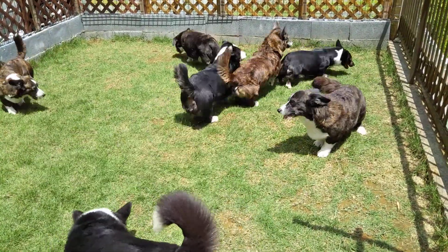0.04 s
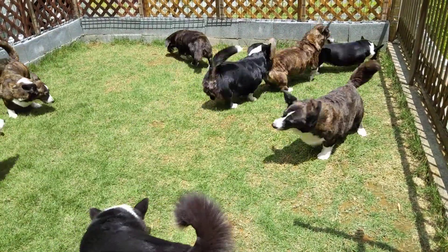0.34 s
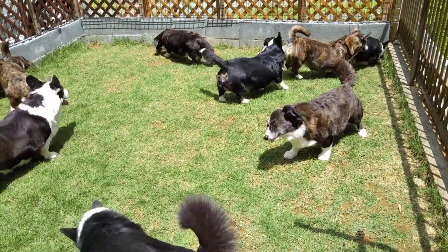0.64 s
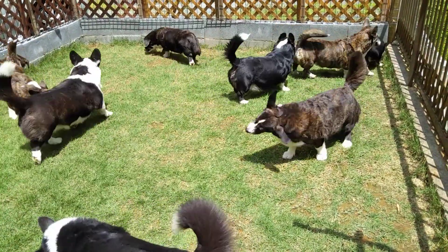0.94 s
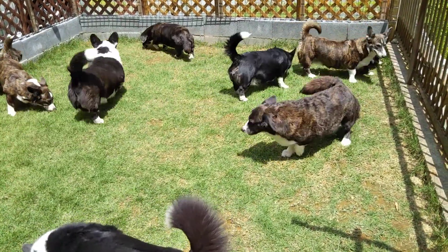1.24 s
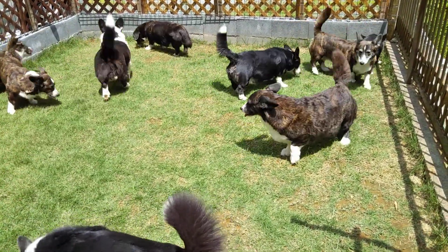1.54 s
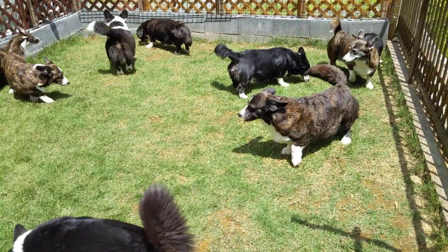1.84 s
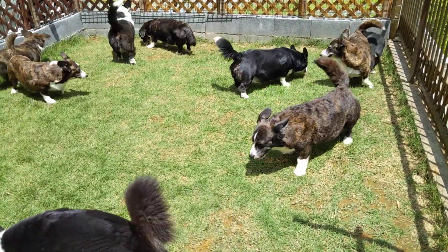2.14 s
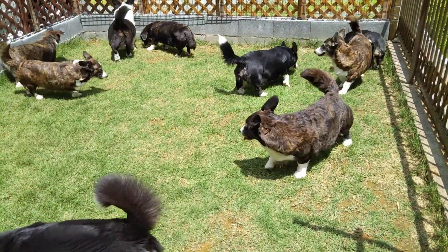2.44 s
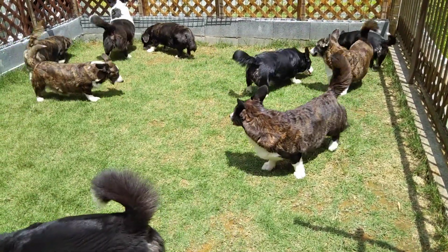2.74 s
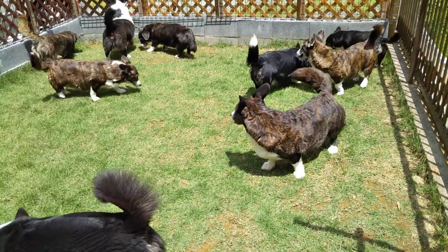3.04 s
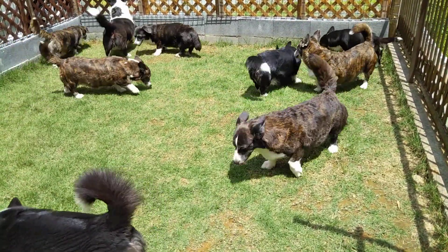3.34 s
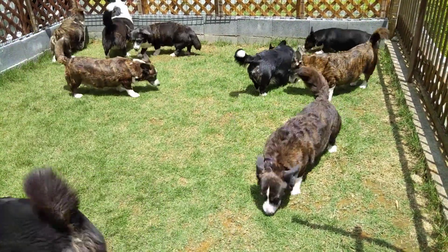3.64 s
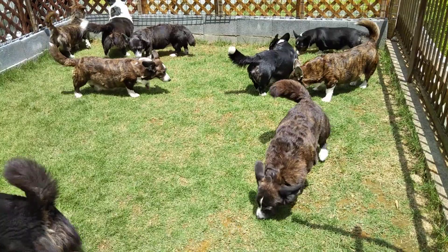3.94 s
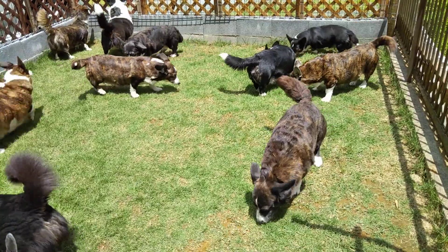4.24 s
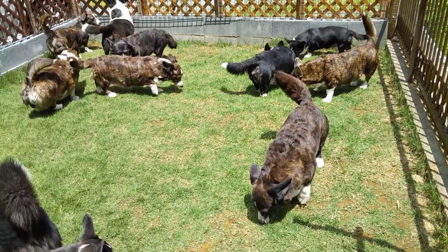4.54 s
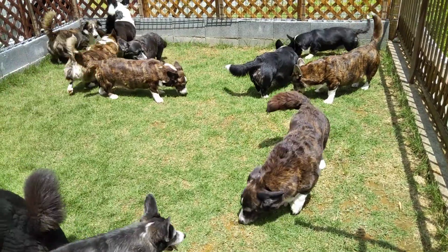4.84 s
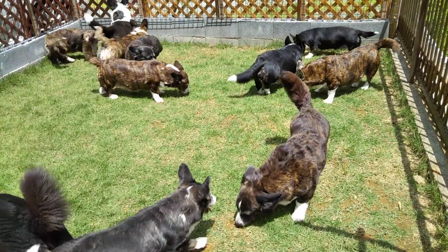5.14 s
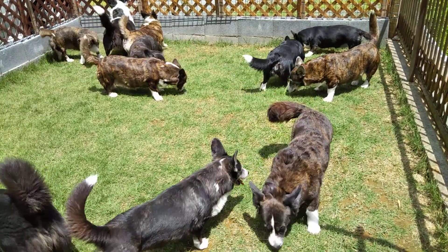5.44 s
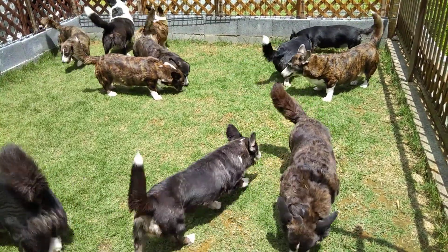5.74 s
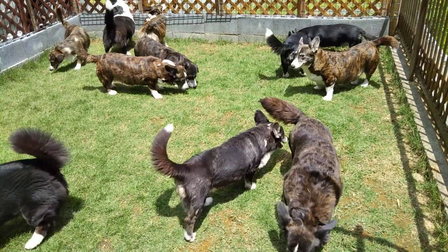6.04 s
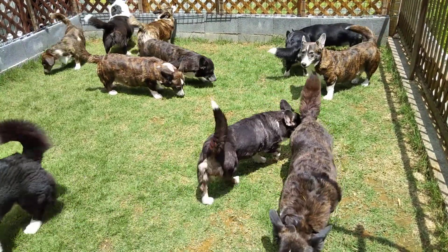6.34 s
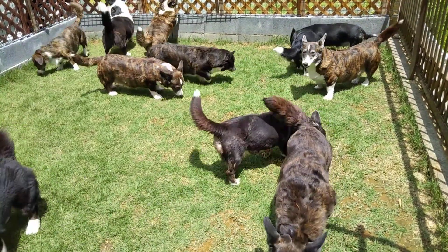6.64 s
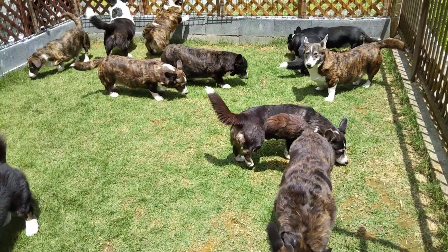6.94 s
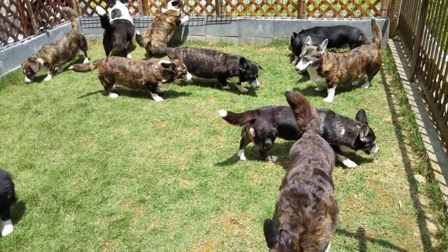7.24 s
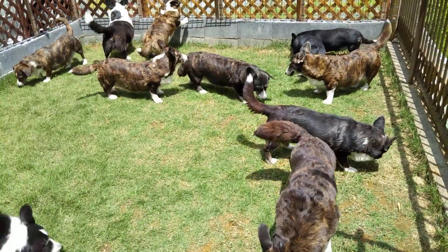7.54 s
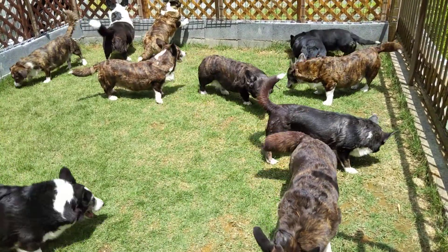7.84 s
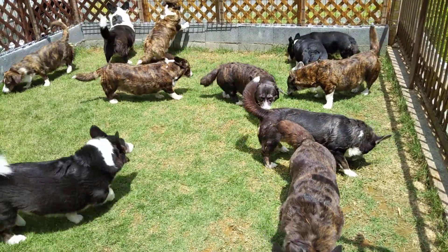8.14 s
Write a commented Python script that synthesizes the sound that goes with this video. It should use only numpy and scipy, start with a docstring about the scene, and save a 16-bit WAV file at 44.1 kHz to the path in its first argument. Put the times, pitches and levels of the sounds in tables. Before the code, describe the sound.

Young dogs play close by on a lawn. A wavering, whiny grumble leads into a grunt and a raspy snarl. Teeth snap and bodies bump before a louder, open snarl, then a smooth low growl lasts about a second. Things quieten to soft paw patter while small birds chirp farther off. Later come one short wuff, a quick metallic clink and a few light bumps, over a quiet outdoor hush.

```python
"""A fenced lawn between houses, where young dogs play: a whiny grumble, snarls, a low growl, a last wuff.
Each voice is a source and a filter: vocal fold pulses and turbulent breath excite throat resonances.
Teeth, paws and a bit of metal ring briefly on impact, and feet scuff the grass by friction.
Birds whistle gliding tones that the walls reflect, over a quiet outdoor hush."""
import sys
import numpy as np
from scipy import signal
from scipy.fft import rfft, irfft, next_fast_len
from scipy.io import wavfile
from scipy.ndimage import uniform_filter1d, map_coordinates

SR = 44100
rng = np.random.default_rng(int(sys.argv[2]) if len(sys.argv) > 2 else 0)


def put_to_file(sound):
    """Save the sound as 16-bit audio at rate SR, in the file named by the first command-line argument."""
    columns = np.atleast_2d(sound).T  # one column per channel
    safe = np.clip(columns, -1, 1)
    whole_steps = np.round(safe * 32767)
    wavfile.write(sys.argv[1], SR, whole_steps.astype(np.int16))


N = 366030
TIME = np.arange(N) / SR


# vocal fold contours: time_s, pitch_hz
WHINE_FOLDS = [(0, 264.3), (.033, 195.2), (0.087, 165.8), (.125, 187.4), (0.163, 207.5), (.205, 194.8),
               (.225, 168.6), (.27, 177.3), (.312, 207.8), (.334, 190), (.35, 123), (.39, 114)]
GRUNT_FOLDS = [(0.499, 142.4), (0.543, 131.4), (0.589, 104.5)]
SNARL_FOLDS = [(.8, 108.1), (0.849, 141.9), (0.919, 137.6), (0.961, 159.2), (1.053, 145), (1.109, 130),
               (1.158, 120), (1.228, 101.2)]
ROAR_FOLDS = [(1.8, 107.6), (1.845, 118.2), (1.875, 149.8), (1.915, 126.3), (1.976, 114.5), (2.025, 120.8),
              (2.081, 152.4), (2.119, 131.8), (2.159, 117.6), (2.226, 105.8)]
GROWL_FOLDS = [(2.605, 67.9), (2.665, 70.2), (2.709, 89.9), (2.83, 105.2), (2.899, 96.9), (3.12, 90.6),
               (3.237, 87.8), (3.521, 74), (3.61, 62.1)]
WUFF_FOLDS = [(6.228, 130), (6.245, 145), (6.256, 203), (6.266, 190.6), (6.278, 133.6), (6.309, 118)]
# band levels, a row each for chest, mouth, rasp, teeth, top-treble hiss: jaws_shut_db, jaws_open_db
WHINE_BANDS = [(-40.5, -40), (-67.5, -55.5), (-70, -53.5), (-63.5, -57.5), (-79, -67.5)]
GRUNT_BANDS = [(-43.5, -66), (-60, -62), (-69.5, -81), (-65, -63), (-82, -85)]
SNARL_BANDS = [(-45.5, -45.5), (-68, -59.5), (-68, -55.5), (-57.5, -62), (-85, -78)]
ROAR_BANDS = [(-41.5, -44.5), (-54, -48.5), (-74, -53), (-74, -60), (-81.5, -81)]
GROWL_BANDS = [(-50, -49)]  # chest only
WUFF_BANDS = [(-40, -54), (-65, -53), (-66.5, -54), (-58.5, -56.5), (-83, -75)]
# vocal tract responses: frequency_hz, gain_db
WHINE_TRACT = [(60, -12), (120, -5.5), (200, -1.5), (275, -3.5), (335, -2), (400, -16), (500, -26),
               (600, -15.5), (690, -18), (795, -11.5), (900, -22.5), (1100, -31), (1800, -34),
               (2700, -42.5), (3500, -34), (3850, -38), (4200, -34.5), (4600, -33), (5400, -39),
               (6500, -45)]
SNARL_TRACT = [(60, -15), (128, 8), (190, -2.5), (290, 6.5), (400, -22), (560, -21.5), (790, -21),
               (930, -28), (1300, -22), (1620, -25), (1930, -15), (2200, -28), (2650, -30), (3050, -25.5),
               (3450, -24), (3900, -29.5), (4600, -29), (6500, -45)]
ROAR_TRACT = [(60, -41), (95, 4), (130, -1), (200, 2), (260, -4), (310, -5.5), (375, -12), (455, -3),
              (530, -7.5), (620, 5), (760, 3), (870, -9.5), (1030, -16), (1150, -30), (1500, -29),
              (1720, -30), (1930, -23.5), (2200, -26.5), (2630, -28), (3000, -26.5), (3180, -19),
              (3350, -24.5), (4800, -23.5), (6500, -40)]
GROWL_TRACT = [(40, 4), (90, 3.5), (145, 6), (205, 7.5), (275, 3), (335, -13), (390, -7), (460, -9),
               (560, -43), (900, -45), (1500, -72)]
WUFF_TRACT = [(60, -12), (135, 2), (195, 0.5), (265, 5.5), (340, -4), (500, -17), (850, -12), (1300, -15),
              (2000, -15), (2400, -33), (2850, -24), (4000, -24), (6500, -46)]
# jaw openings: widest_s, half_length_s, open_fraction
WHINE_GAPES = [(.005, 0.05, 1), (0.287, 0.046, 0.55)]
GRUNT_GAPES = [(.512, 0.025, 0.95)]
SNARL_GAPES = [(.93, 0.2, 0.92)]
ROAR_GAPES = [(1.862, 0.093, 0.97), (2.085, 0.051, 0.38)]
WUFF_GAPES = [(6.277, 0.014, 0.94)]
# sudden heaves of the chest: peak_s, drive_db
WHINE_SURGES = [(.037, 1.2), (.123, 3.5), (.156, 1.9), (.203, 4), (.262, 6), (.298, 3)]
SNARL_SURGES = [(.838, 3), (.868, 3.5), (.916, 3), (.972, 9), (1.045, 3), (1.082, 5.5), (1.16, 2.5),
                (1.177, 5.5), (1.193, 7)]
ROAR_SURGES = [(1.876, 5.5), (1.905, 4.5), (1.937, 5), (2.052, 2.5), (2.078, 4), (2.117, 5), (2.151, 4.5)]
# thin nose whistles on the whine: start_s, length_s, pitch_hz, level_db
NOSE_TONES = [(0.112, 0.059, 4210, -67), (0.166, 0.061, 4210, -61)]

def dogs():
    """Phonation: regular fold pulses give a whine or smooth growl; jitter and breath roughen a snarl."""
    drive = effort(WHINE_FOLDS, attack_s=0.00055, release_s=0.029, db_per_octave=29, throb_db=1,
                   heaves=WHINE_SURGES)
    whine = utter(WHINE_BANDS, WHINE_FOLDS, WHINE_TRACT, drive, WHINE_GAPES,
                  jitter=0.035, flutter_db=2, breath=0.7, hoarse=0.8, wander=0.018)

    drive = effort(GRUNT_FOLDS, attack_s=0.009, release_s=0.047, db_per_octave=12, throb_db=3.5)
    grunt = utter(GRUNT_BANDS, GRUNT_FOLDS, SNARL_TRACT, drive, GRUNT_GAPES,
                  jitter=0.063, flutter_db=2.5, breath=1, hoarse=1)

    drive = effort(SNARL_FOLDS, attack_s=0.042, release_s=0.041, db_per_octave=-10, throb_db=0.5,
                   tire_db_per_s=13, heaves=SNARL_SURGES)
    snarl = utter(SNARL_BANDS, SNARL_FOLDS, SNARL_TRACT, drive, SNARL_GAPES,
                  jitter=0.085, flutter_db=3, breath=1.4, hoarse=1.3, wander=0.018, chop=0.6)

    drive = effort(ROAR_FOLDS, attack_s=0.0105, release_s=0.1, db_per_octave=10, throb_db=1.5,
                   heaves=ROAR_SURGES)
    roar = utter(ROAR_BANDS, ROAR_FOLDS, ROAR_TRACT, drive, ROAR_GAPES,
                 jitter=0.065, flutter_db=3.2, breath=0.5, hoarse=0.7, open_stretch=1.05, wander=0.035)

    drive = effort(GROWL_FOLDS, attack_s=0.035, release_s=0.015, db_per_octave=13, throb_db=0.9,
                   tire_db_per_s=4.5)
    growl = utter(GROWL_BANDS, GROWL_FOLDS, GROWL_TRACT, drive, gapes=(),
                  jitter=0.014, flutter_db=0.7, breath=0.3, hoarse=0, wander=0.005)

    drive = effort(WUFF_FOLDS, attack_s=0.02, release_s=0.031, db_per_octave=9, throb_db=1.5)
    wuff = utter(WUFF_BANDS, WUFF_FOLDS, WUFF_TRACT, drive, WUFF_GAPES,
                 jitter=0.04, flutter_db=4, breath=0.59, hoarse=1.9)

    for start, length, hz, db in NOSE_TONES:
        add(whine, start, whistle([hz, hz], length, db, buzz_hz=55))
    return whine + grunt + snarl + roar + growl + wuff


# how far chest, mouth, rasp, teeth and top-treble hiss follow the effort: drive_fraction
DRIVE_SHARES = [0.92, 0.87, 0.2, 0.39, 0.77]

def utter(levels, pitch, tract, drive_db, gapes, jitter, flutter_db, breath, hoarse,
          open_stretch=1, wander=0.031, chop=0.69):
    """Source-filter model: uneven fold pulses and noise chopped at their rate excite the vocal tract."""
    t = span(pitch)
    opening = jaws(t, gapes)
    bands_db = [shut_db + (open_db - shut_db) * opening + drive_db * share
                for share, (shut_db, open_db) in zip(DRIVE_SHARES, levels)]
    fold_hz = np.interp(t, *np.transpose(pitch)) * np.exp(jitter * wobble(t, 130))
    cycles = np.cumsum(fold_hz) / SR
    pulses = unit(np.diff(np.floor(cycles), prepend=0))
    noise = unit(rng.standard_normal(len(t)) * np.exp(-chop * (cycles % 1)))
    flutter = amp(flutter_db * wobble(t, 90.8))  # loose tissue varies the size of the pulses
    # open jaws scale the resonances by open_stretch; tongue and lips make them wander
    stretch = 1 + (open_stretch - 1) * opening + wander * wobble(t, 16.3)
    voiced, noisy = (formants(x * flutter, tract, stretch) for x in (pulses, noise))
    # as the mouth closes, the chest hums more purely on the fundamental
    chest_lead_db = bands_db[0] - np.mean(bands_db[:3], axis=0)
    shut = np.clip(chest_lead_db / 14, 0, 1) ** 3
    fundamental = band(voiced, 55, 1.47 * np.median(pitch, axis=0)[1])
    voiced = voiced + 1.7 * shut * fundamental
    # low_hz, high_hz, noise_gain, swell_db
    registers = [(56.7, 483, breath, 0),  # chest
                 (436, 1160, hoarse, 0.0089),  # mouth
                 (1160, 2760, 3 * hoarse, 1.8),  # rasp
                 (2710, 5800, 6.8 * hoarse, 1.8),  # teeth
                 (7940, 14800, 20, 0)]  # faint top-treble hiss that swells along with the call
    voice = 0
    for db, (low, high, noise_gain, swell_db) in zip(bands_db, registers):
        gain = amp(db + swell_db * wobble(t, 35.8))
        voice += gain * steady(band(voiced + noise_gain * noisy, low, high))
    track = np.zeros(N)
    add(track, t[0], voice * signal.windows.tukey(len(t), 400 / len(t)))
    return track


def effort(pitch, attack_s, release_s, db_per_octave, throb_db, tire_db_per_s=0, heaves=()):
    """Amplitude modulation: the drive in dB varies with pitch, chest heaves and flapping tissue."""
    edge_db, push_limit_db, heave_s, throb_hz = 19.5, 2.5, 0.0068, 29.3
    t = span(pitch)
    age = t - t[0]
    hz = np.interp(t, *np.transpose(pitch))
    edges = np.maximum(1 - age / attack_s, 0) + np.maximum(1 - (t[-1] - t) / release_s, 0)
    push = np.minimum(db_per_octave * np.log2(hz / np.median(pitch, axis=0)[1]), push_limit_db)
    heave = sum(db * np.exp(-((t - peak) / heave_s) ** 2) for peak, db in heaves)
    throb = throb_db * np.sin(2 * np.pi * throb_hz * age + wobble(t, 21.4))
    return push + heave + throb - edge_db * edges - tire_db_per_s * age


def jaws(t, gapes):
    """The radiating aperture opens and closes in Gaussian arcs: 0 shut, 1 wide."""
    return np.clip(sum(wide * np.exp(-((t - peak) / half) ** 2) for peak, half, wide in gapes), 0, 1)


def formants(x, tract, stretch, count=6):
    """Tract resonances glide by the factor stretch, as a crossfade of frequency-scaled filters."""
    steps, gap = np.linspace(stretch.min(), stretch.max(), count, retstep=True)
    voice = 0
    for step in steps:
        weight = np.maximum(1 - np.abs(stretch - step) / gap, 0)
        voice += resonate(x * weight, np.multiply(tract, [step, 1]))
    return voice


# teeth snapping shut: start_s, level_db, centre_hz
BITES = [(1.439, -45, 4300), (2.538, -50.5, 4140), (3.573, -54, 3440), (7.937, -56.5, 4100)]

def teeth():
    """Hard impact: brief contact excites a narrow resonance and a bright crack."""
    track = np.zeros(N)
    for start, db, hz in BITES:
        add(track, start, contact(db, hz, octaves=0.3, t60_s=0.042, snap=3.8))
        add(track, start, crack(db - 13.5))
    return track


# paws and bodies colliding: start_s, level_db, centre_hz, width_octaves, t60_s
BUMPS = [(.507, -58, 994, 0.89, .05), (1.441, -49.5, 1300, 0.39, 0.27), (1.579, -54, 2600, 1.1, .04),
         (1.633, -53, 3880, 0.43, .04), (1.662, -37, 1570, 1.2, 0.022), (1.726, -41.5, 845, 1.5, 0.032),
         (1.733, -39, 940, 3.1, 0.018), (1.807, -34.5, 970, 0.74, 0.05), (3.673, -57.5, 3020, 1.1, 0.11),
         (3.881, -59, 1980, 0.46, .04), (4.015, -54.5, 550, 1.1, 0.043), (4.113, -56, 2000, 0.15, 0.063),
         (4.38, -49, 1235, 0.21, 0.049), (4.432, -57.5, 1310, 0.85, 0.044), (4.794, -57.5, 704, 1.2, 0.064),
         (5.173, -58, 800, 0.88, 0.093), (5.273, -48, 1130, 2.6, 0.019), (5.77, -51.5, 1800, 0.91, 0.034),
         (5.979, -60, 1220, 0.27, 0.039), (7.514, -41.5, 400, 3.4, 0.021), (7.566, -41.5, 280, 0.86, 0.026),
         (7.705, -61.5, 2580, 0.73, 0.098), (8.117, -55.5, 80, 0.36, .16)]

def knocks():
    """Damped impact: each collision excites one quickly decaying resonance."""
    track = np.zeros(N)
    for start, *body in BUMPS:
        add(track, start, contact(*body))
    return track


# quick metallic contacts: start_s, level_db, centre_hz, width_octaves, t60_s
METAL_HITS = [(6.447, -38.5, 4600, 0.43, .02), (6.452, -42, 4640, 0.62, 0.1),
              (6.466, -40, 4000, 4.6, 0.026), (6.470, -43, 4230, 1.2, .08)]

def metal_clatter():
    """Free vibration: struck metal keeps a thin, lightly damped ring after the last contact."""
    track = np.zeros(N)
    for start, db, *body in METAL_HITS:
        add(track, start, contact(db, *body))
        add(track, start, crack(db - 10))
    add(track, METAL_HITS[-1][0], contact(db=-66, centre_hz=9600, octaves=0.1, t60_s=0.39))
    return track


def contact(db, centre_hz, octaves, t60_s, snap=1.0):
    """Impulse response of a resonance, plus a noisy rattle that decays exponentially."""
    t = np.arange(SR // 4) / SR
    hz = np.geomspace(40, 14000, num=60)
    colour = np.column_stack([hz, 20 * np.log10(resonance(hz, centre_hz, octaves))])
    blow = resonate(signal.unit_impulse(len(t)), colour)
    envelope = amp(-60 * t / t60_s) * (1 - np.exp(-t / 0.00081))
    rattle = resonant_noise(t, centre_hz, octaves) * envelope
    return amp(db) * (snap * blow / np.abs(blow).max() + rattle)


def crack(db, t60_s=0.016):
    """Contact transient: two hard surfaces meet in a short burst of high treble."""
    t = np.arange(SR // 10) / SR
    return amp(db - 60 * t / t60_s) * unit(band(rng.standard_normal(len(t)), 7100, 16300))


# strokes of feet on grass: peak_s, level_db, centre_hz, half_length_s
FOOT_STROKES = [(0.431, -62, 1090, 0.024), (1.623, -60, 278, 0.12), (1.798, -54, 1215, 0.0092),
                (3.051, -61, 1180, 0.059), (3.135, -58, 1960, 0.039), (3.436, -61.5, 1500, 0.067),
                (5.298, -60.5, 1250, 0.028), (5.363, -62.5, 580, 0.02), (5.734, -63.5, 910, 0.051),
                (6.519, -56.5, 4400, 0.064), (7.106, -59.5, 2740, 0.042), (7.166, -63.5, 563, 0.11)]

def scuffs(grain_db):
    """Friction noise: blades of grass crackle under each swelling stroke."""
    track, t = np.zeros(N), np.arange(-SR // 4, SR // 4) / SR
    for peak, db, hz, half in FOOT_STROKES:
        grains = unit(resonant_noise(t, hz, octaves=1) * amp(grain_db * wobble(t, 302)))
        add(track, peak + t[0], amp(db) * grains * np.exp(-2 * (t / half) ** 2))
    return track


def patter(level_db, spread_db, count=60):
    """Soft impact: paws brush the lawn at random, each a rounded pulse of noise."""
    track, t = np.zeros(N), np.arange(SR // 8) / SR
    press = (t / 0.0069) * np.exp(-t / 0.012)
    for when, size, pitch in rng.random((count, 3)):
        brush = resonant_noise(t, 400 * 10 ** pitch, octaves=0.74)
        add(track, when * N / SR, brush * press * amp(level_db + spread_db * size))
    return track


def claws(level_db, spread_db, centre_hz, count=14):
    """Narrow-band impacts: claws tick faintly on dry turf at random."""
    track = np.zeros(N)
    for when, size, pitch in rng.random((count, 3)):
        hz = centre_hz * 2 ** (2 * pitch - 1)
        add(track, when * N / SR, contact(level_db + spread_db * size, hz, octaves=0.24, t60_s=0.13))
    return track


# quick upward sweeps: start_s, level_db, buzz_depth_hz
BIRD_SWEEPS = [(3.199, -61, 164), (3.51, -63, 217), (3.836, -63.5, 198), (4.16, -59, 190),
               (5.485, -60, 100), (5.795, -58.5, 59.7), (6.121, -57.5, 50)]
# soft slurs: start_s, length_s, level_db, start_hz, second_hz, third_hz, end_hz
BIRD_SLURS = [(4.855, 0.28, -72, 2750, 2216, 2730, 3300), (6.005, 0.062, -75, 2550, 2480, 2510, 2450),
              (6.071, 0.28, -72.5, 1850, 2366, 2600, 3240), (7.351, 0.32, -73.5, 2800, 2114, 2550, 3320)]
# short notes and flicks: start_s, length_s, level_db, start_hz, middle_hz, end_hz
BIRD_PIPS = [(4.96, .08, -71, 3250, 3650, 3900), (6.566, 0.039, -64, 4400, 4560, 4430),
             (6.985, 0.037, -63.5, 4630, 5070, 5800), (7.285, 0.0345, -68, 3790, 4250, 4550),
             (7.32, 0.093, -66, 4550, 4530, 4520)]
# buzzy arched notes: start_s, length_s, start_hz, end_hz, level_db, buzz_depth_hz
BIRD_BUZZES = [(3.982, 0.069, 3850, 3820, -69, 304), (4.467, 0.1, 4110, 3355, -63.5, 383),
               (4.711, .28, 4050, 4520, -64.5, 139), (5.198, .2, 4133, 4525, -62, 133),
               (5.373, 0.078, 3500, 3510, -68, 70), (6.59, 0.17, 3470, 3780, -69.5, 130),
               (6.736, 0.031, 4100, 4150, -59, 130), (6.808, .04, 4150, 4200, -78, 150)]

def birds(arch_hz=109.4):
    """Tonal song: each note is a single gliding partial."""
    track = np.zeros(N)
    for start, db, buzz_hz in BIRD_SWEEPS:
        add(track, start, whistle([3650, 5036, 5924], 0.09, db, buzz_hz, attack_s=0.026))
    for start, length, db, *pitches in BIRD_SLURS:
        add(track, start, whistle(pitches, length, db, buzz_hz=55, release_share=0.12))
    for start, length, db, *pitches in BIRD_PIPS:
        add(track, start, whistle(pitches, length, db, buzz_hz=90))
    for start, length, start_hz, end_hz, db, buzz_hz in BIRD_BUZZES:
        middle_hz = (start_hz + end_hz) / 2 + arch_hz
        add(track, start, whistle([start_hz, middle_hz, end_hz], length, db, buzz_hz))
    return track


def whistle(pitches, length_s, db, buzz_hz, attack_s=0.016, release_share=0.42):
    """Frequency modulation: a fast random quaver gives a gliding sine its buzzy sidebands."""
    progress = np.linspace(0, 1, round(length_s * SR))
    t = progress * length_s
    glide = np.polyfit(np.linspace(0, 1, len(pitches)), pitches, len(pitches) - 1)
    hz = np.polyval(glide, progress) + buzz_hz * wobble(t, 504.6)
    swell = np.minimum(t / attack_s, 1) * np.minimum((1 - progress) / release_share, 1)
    return amp(db) * unit(np.sin(2 * np.pi * np.cumsum(hz) / SR) * swell)


# reflections from house walls: delay_s, gain_db
WALL_PATHS = [(.066, -7.5), (0.123, -9)]

def wall_echoes(song):
    """Reflection: walls return delayed copies of the song's treble over a diffuse tail."""
    echoes = yard(song)
    for delay, db in WALL_PATHS:
        add(echoes, delay, amp(db) * song)
    return band(echoes, 2850, 9000)


# reverberation times of the yard: frequency_hz, t60_s
YARD_DECAY = [(150, 0.25), (1000, 0.46), (3000, 0.16), (5000, 1), (9000, 0.54)]

def yard(x):
    """Diffuse reverberation: fences and walls scatter sound into an exponentially decaying tail."""
    hz, t, noise = signal.stft(rng.standard_normal(SR), SR, nperseg=256)
    decay = amp(-60 * t / along(YARD_DECAY, hz)[:, None])
    tail = signal.istft(noise * decay, SR, nperseg=256)[1]
    return signal.fftconvolve(x, np.pad(tail, (300, 0)) / np.linalg.norm(tail))[:N]


# wash of distant birds: time_s, level_db
CHORUS_SWELL = [(0, -69), (2.9, -71.5), (3.3, -67.5), (4.3, -62.5), (5.3, -60), (6.3, -63), (6.9, -60),
                (7.4, -67.5), (8.3, -69.5)]

def chorus(centre_hz, octaves, gain_db, shimmer_db=1.3):
    """Incoherent summation: echoes of far birds merge into a shimmering band of noise."""
    level_db = np.interp(TIME, *np.transpose(CHORUS_SWELL)) + gain_db + shimmer_db * wobble(TIME, 14)
    return amp(level_db) * unit(band(resonant_noise(TIME, centre_hz, octaves), 1500, 6340))


# outdoor noise spectrum: frequency_hz, gain_db
HUSH_SPECTRUM = [(15, -65), (25, -21), (70, -4), (137, -8), (209, -10), (517, -15.5), (711, -17.5),
                 (1120, -20.5), (1380, -21), (1540, -24.5), (2000, -20), (2830, -24), (4210, -35.5),
                 (7170, -36.5), (14300, -26.5)]
# likeness of left and right: frequency_hz, correlation
HUSH_COHERENCE = [(3000, 1), (5000, 1), (7000, 0.75), (12000, 0.31)]

def hush(level_db, drift_db):
    """Interaural coherence: distant noise sounds central, except for its less correlated top hiss."""
    def mid_side_gains(hz):
        angle = np.arccos(np.clip(along(HUSH_COHERENCE, hz), -1, 1)) / 2
        return amp(along(HUSH_SPECTRUM, hz)) * [np.cos(angle), np.sin(angle)]
    mid, side = filtered(rng.standard_normal((2, N)), mid_side_gains)
    return amp(level_db + drift_db * wobble(TIME, 8.3)) * unit(np.array([mid + side, mid - side]))


def resonance(hz, centre_hz, octaves):
    """Gain of one resonance on a slope that dulls the top treble."""
    slope = [(40, -11), (90, 12.5), (5200, 3), (6300, -15.5), (13000, -21)]  # frequency_hz, gain_db
    return amp(along(slope, hz)) / (1 + (np.log2((hz + 1) / centre_hz) / octaves) ** 2)


def resonant_noise(t, centre_hz, octaves):
    """Noise of rms 1, shaped by a resonance."""
    return unit(filtered(rng.standard_normal(len(t)), lambda hz: resonance(hz, centre_hz, octaves)))


def resonate(x, colour, size=8192):
    """Minimum-phase filtering by a colour of (frequency_hz, gain_db) points."""
    gain = amp(along(colour, np.fft.rfftfreq(size, 1 / SR)))
    cepstrum = irfft(np.log(gain))
    cepstrum[1:size // 2] *= 2  # folding onto positive time makes the filter causal
    cepstrum[size // 2 + 1:] = 0
    return signal.fftconvolve(x, irfft(np.exp(rfft(cepstrum))))[:len(x)]


def band(x, low_hz, high_hz):
    """Steep band-pass."""
    return filtered(x, lambda hz: (1 - 1 / (1 + (hz / low_hz) ** 8)) / (1 + (hz / high_hz) ** 8))


def filtered(x, response):
    """Zero-phase filtering: the spectrum times a response of frequency."""
    n = x.shape[-1]
    padded = next_fast_len(n + 4096)
    return irfft(rfft(x, padded) * response(np.fft.rfftfreq(padded, 1 / SR)), padded)[..., :n]


def steady(x):
    """Hold the rms at 1 over a few cycles, keeping the quick flutter."""
    power = uniform_filter1d(uniform_filter1d(x ** 2, size=1600), size=1600)
    return x / np.sqrt(np.abs(power) + 1e-14)


def wobble(t, rate):
    """A smooth random curve, rate knots a second."""
    at = (t - t[0]) * rate
    return map_coordinates(rng.standard_normal(int(at[-1]) + 4), [at])


def along(points, hz):
    """Interpolate (frequency_hz, value) points on a log axis."""
    knots_hz, values = np.transpose(points)
    return np.interp(np.log(hz + 1), np.log(knots_hz + 1), values)


def span(pitch):
    """Sample times from the start of an utterance to its end."""
    return np.arange(round(pitch[0][0] * SR), round(pitch[-1][0] * SR)) / SR


def add(track, start_s, sound):
    """Superpose a sound on the track."""
    part = track[max(round(start_s * SR), 0):][:len(sound)]
    part += sound[:len(part)]


def amp(db):
    """Decibels to gain."""
    return 10 ** (np.asarray(db) / 20)


def unit(x):
    """Scale to rms 1."""
    return x / np.sqrt(np.mean(x ** 2) + 1e-20)


def scene():
    """Direct-to-reverberant ratio sets distance: the dogs are near and dry, the birds mostly echo."""
    paws = scuffs(grain_db=3.5) + patter(level_db=-63.5, spread_db=4)
    paws += claws(level_db=-72.5, spread_db=4, centre_hz=1540)
    near = dogs() + teeth() + knocks() + metal_clatter() + paws
    song = birds()
    far = band(song + amp(2) * wall_echoes(song), 1200, 5430)
    far += chorus(centre_hz=4350, octaves=0.5, gain_db=-1)
    return near + amp(-11) * yard(near) + far + hush(level_db=-64.5, drift_db=0.5)


def record(dry):
    """Band limiting: an ideal low-pass removes the highest treble."""
    return filtered(dry, lambda hz: hz < 14350)


dry = scene()
out = record(dry)
put_to_file(out)
```